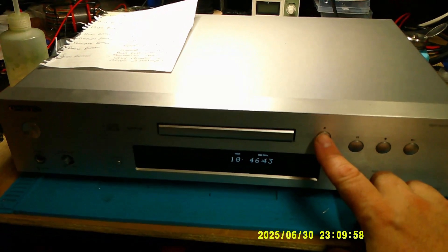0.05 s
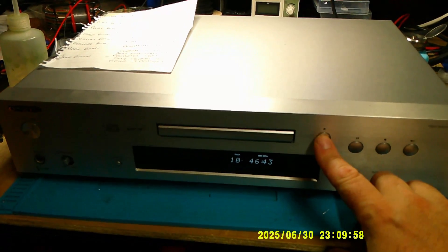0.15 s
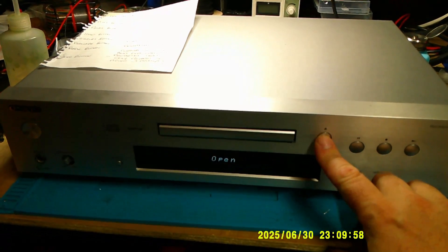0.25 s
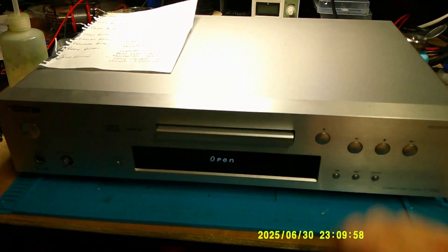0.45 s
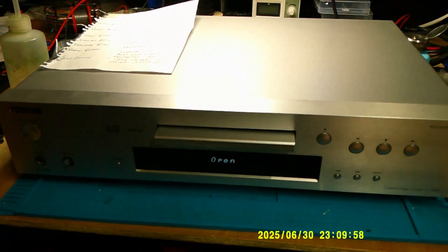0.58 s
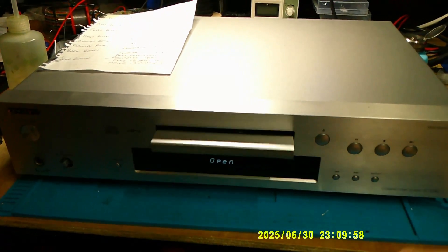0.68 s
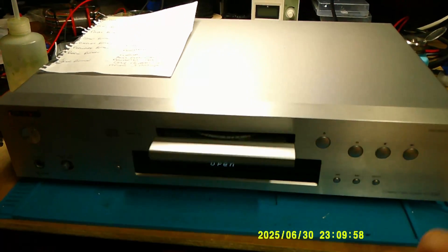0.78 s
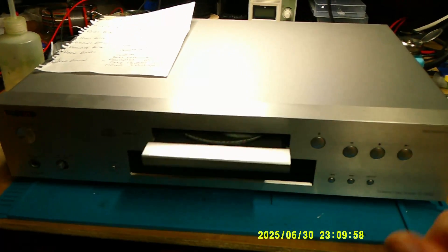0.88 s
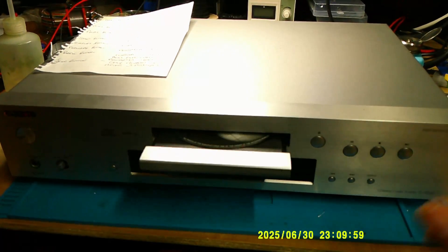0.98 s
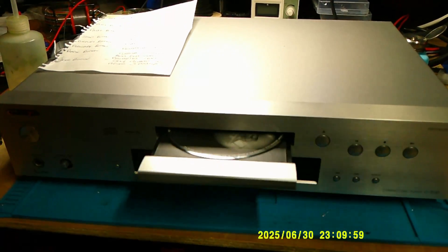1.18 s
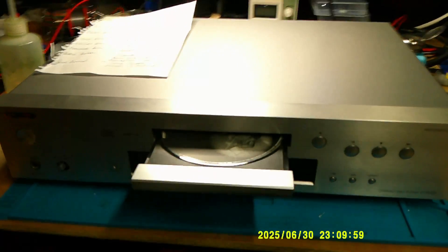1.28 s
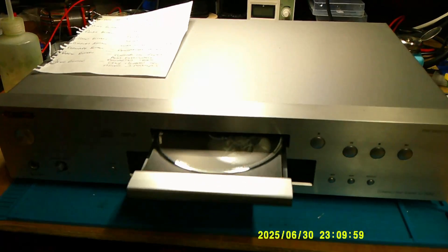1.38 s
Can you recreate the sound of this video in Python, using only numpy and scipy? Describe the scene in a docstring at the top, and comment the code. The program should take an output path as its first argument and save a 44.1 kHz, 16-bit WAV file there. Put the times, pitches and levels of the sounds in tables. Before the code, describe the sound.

A disc player's tray opens: a button clicks in and out with a slight metallic ring, the mechanism thuds and rattles, then a small motor whirrs as the tray slides out, knocking lightly. Close by in a small, quiet room.

```python
"""On a workbench in a small room, the eject button of a disc player is pressed and let go.
Each click makes the metal front ring. Inside, a cam (a shaped wheel) lowers the disc drive
with thuds, a plastic rattle and sharp latch ticks. A small motor hums and its gears whirr,
and they keep running as the tray slides out, knocking lightly in its guides."""
import sys
import numpy as np
from scipy import signal
from scipy.fft import rfft, irfft
from scipy.io import wavfile

SR = 44100
rng = np.random.default_rng(int(sys.argv[2]) if len(sys.argv) > 2 else 0)


def master_out(mix):
    """Clip the mix to full scale and print it as 16-bit PCM to the path in sys.argv[1]."""
    frames = np.transpose(np.atleast_2d(mix))
    ceiling = np.clip(frames, -1, 1)
    pcm = np.round(ceiling * 32767).astype(np.int16)
    wavfile.write(sys.argv[1], SR, pcm)


N = 63945

# The press and the release. Each row: start in seconds, then a boost in dB for each band below.
CLICKS = [(0.2314, -2.5, 2, -5, -3.5), (.3878, 2, -3, -23, -9.5)]
CLICK_BANDS_HZ = [900, 2200, 4500, 7500]
# Tones of the button and front. Each row: pitch in Hz, level in dB, fade and rise in seconds.
PANEL_TONES = [(412.6, -36, 0.32, 0.006), (557, -33.5, 0.02, 0.00069), (725.4, -24.5, 0.11, 0.0012),
               (1004, -22, 0.14, 0.0064), (1026.4, -20.5, 0.12, 0.0054), (1340, -32, 0.019, .001),
               (1693, -35, 0.16, 0.00045), (1818, -14.5, 0.021, 0.00015), (2194, -24, 0.04, 0.0001),
               (2602, -22, .045, 0.00023), (3563, -23, 0.034, 0.0002), (4264, -13, 0.021, 0.00025),
               (4663, -12, .016, 0.00024), (5120, -19, 0.026, 0.0004), (7350, -21.5, 0.019, 0.00053)]
# The dense ring of the case. Each row of a COLOUR table: frequency in Hz, relative level in dB.
CASE_COLOUR = [(100, -43.5), (220, -4.5), (600, 3.5), (850, 0), (1150, 6), (1500, -11), (1900, -7.5),
               (2700, -2), (3250, -5.5), (4300, -0.5), (5100, -16), (5700, -10.5), (6700, -12.5),
               (7400, -13), (9000, -25.5)]
# The turning cam. Each row: time in seconds, rattle level in dB, rumble level in dB.
CAM_LEVELS = [(.27, -51.5, -52.5), (.315, -47, -50), (.344, -33.5, -41.5), (.365, -42.5, -40),
              (.385, -50, -36), (.418, -37.5, -55), (.433, -31, -48), (.468, -46, -37.5), (.495, -39, -39),
              (.513, -31, -39), (.55, -40.5, -32.5), (.6, -59, -43.5), (.68, -76, -48.5)]
# The cam's plastic rattle.
RATTLE_COLOUR = [(80, -29), (200, -14), (380, 3), (550, 10.5), (750, -1), (1150, 8), (1600, -4.5),
                 (2300, -8), (4500, -25), (8000, -45)]
# Tones of the player's frame. Each row: pitch in Hz, level in dB, fade in seconds.
FRAME_TONES = [(157.5, 0, .2), (216.2, 0.5, 0.23), (248.6, 1.5, 0.23), (290.3, -2.5, 0.18),
               (324.6, -1, 0.2), (423, -8.5, .12), (453, 0, 0.08), (519, -6, 0.099)]
# The drive landing on the frame. Each row: start in seconds, level in dB.
DRIVE_THUDS = [(0.2774, -33), (.3270, -34), (.4270, -35.5), (.4830, -44.5), (.5220, -29), (.6190, -37)]
# The dull burst of noise in a thud.
THUD_COLOUR = [(60, -31.5), (150, -6), (300, -2), (500, -6), (800, -5), (2000, -26), (9000, -68)]
# The gears and sliding tray. Each row: time in seconds, level in dB.
GEAR_LEVELS = [(.27, -51), (.45, -36), (.68, -51.5), (.84, -46), (.95, -50), (1.2, -51), (1.32, -47.5),
               (1.45, -49.5)]
# The low whirr of the gears.
GEAR_COLOUR = [(60, -29.5), (110, -16.5), (175, -6), (220, 5.5), (265, -5.5), (330, 4.5), (400, -7.5),
               (520, -7), (780, -5), (1100, -13.5), (2000, -20), (3500, -27.5), (5200, -34), (8000, -39.5)]
# The motor's run. Each row: time in seconds, turns per second, level in dB.
MOTOR_RUN = [(.28, 129, -53), (.55, 139, -38), (.69, 141.1, -51), (.745, 140.8, -45), (.80, 133.3, -52),
             (.88, 141, -44.5), (.96, 140.1, -51.5), (1.12, 142, -46.5), (1.21, 142.4, -50),
             (1.28, 143.8, -45.5), (1.37, 142.5, -51), (1.43, 143.4, -46)]
# Tones of the hum. Each row: multiple of the motor's speed, level in dB.
HUM_TONES = [(1, -7.5), (2, -0.5), (3, -13.5), (4, -9.5), (5, -18), (6, -23), (7, -25), (8, -21.5)]
# The latch catching. Each row: start in seconds, level in dB, rise in seconds.
LATCH_TICKS = [(0.3229, -46.5, 0.001), (0.4234, -36, 0.0024), (.4830, -32, 0.00073), (0.5233, -49.5, .001),
               (0.6175, -55, .0005)]
# The bright noise of a latch tick.
LATCH_COLOUR = [(500, -23), (1600, -16), (2100, 6.5), (2800, -1.5), (3400, 4.5), (4000, -5), (4350, 2.5),
                (4900, -11.5), (6000, 4.5), (7000, -6.5), (7700, 4.5), (9000, -22)]
# The tray hitting its guides. Each row: start in seconds, ring and tick levels in dB,
# the ring's rise and fade in seconds, boosts in dB for the hollow body and the plastic edge.
TRAY_KNOCKS = [(.7495, -27.5, -44.5, .011, 0.13, -14, -23), (1.1130, -48, -55, 0.0027, .2, 8.5, -8.5),
               (1.3240, -44.5, -59, 0.0026, 0.094, 3, -3), (1.3598, -50, -45.5, 0.0003, 0.2, 14.5, 11.5)]
KNOCK_BANDS_HZ = [590, 1040, 2900]  # body, middle, edge
# Tones of the tray. Each row: pitch in Hz, level in dB.
TRAY_TONES = [(640, -12.5), (875, -1), (1168, 0.5), (1300, -6), (1400, -5), (2140, -8), (2660, -15.5),
              (3130, -13)]
# The noisy part of the tray's ring.
TRAY_COLOUR = [(100, -37), (220, -15.5), (350, 2), (700, 4.5), (950, -1), (1300, 5.5), (1700, -6),
               (2250, -5), (2650, -2), (3300, -12.5), (3800, -25.5), (8000, -30.5)]
# The tick where tray and guide meet.
CONTACT_COLOUR = [(500, -1.5), (2200, 4), (4500, -11.5), (6500, -12.5), (9000, -29)]
# The quiet background of the room.
BACKGROUND_COLOUR = [(20, -18), (45, -12.5), (62, -17), (95, -8), (135, -6.5), (250, -8), (400, -18.5),
                     (600, -21), (1000, -25), (2000, -29), (4000, -37), (5300, -42.5), (7500, -31),
                     (8300, -48), (9000, -61.5)]


def amp(db):
    """Turns decibels into a number to multiply by."""
    return 10 ** (np.asarray(db) / 20)


def unit(x):
    """Scales a signal to an average strength (rms) of 1."""
    return x / np.sqrt(np.mean(x ** 2) + 1e-20)


def clock():
    """The time of each sample in seconds."""
    return np.arange(N) / SR


def curve(points, column=1):
    """Joins one column of a time table with straight lines."""
    columns = np.transpose(points)
    return np.interp(clock(), columns[0], columns[column])


def colour(x, points):
    """Turns frequencies up or down by rows of Hz and dB."""
    hz, db = np.transpose(points)
    gain = amp(np.interp(np.log(np.fft.rfftfreq(2 * N, 1 / SR) + 1), np.log(hz), db))
    return irfft(rfft(x, 2 * N) * gain)[:N]


def noise(points):
    """Noise of strength 1, shaped by a colour table."""
    return unit(colour(rng.standard_normal(N), points))


def grains(per_s, spread_db):
    """Many tiny hits of uneven size at random times."""
    size = amp(spread_db * np.minimum(rng.exponential(1, N), 4))
    return size * rng.choice([-1, 1], N) * (rng.random(N) < per_s / SR)


def ring(rise_s, fade_s):
    """A level that builds up and dies away; the fade is the time to fall by 60 dB."""
    return (1 - np.exp(-clock() / max(rise_s, 1e-5))) * np.exp(-np.log(1000) * clock() / fade_s)


def tone(hz):
    """A pure tone that starts anywhere in its cycle."""
    return np.sin(2 * np.pi * (hz * clock() + rng.random()))


def drift(hz):
    """A random wobble of strength 1, slower than hz."""
    return unit(irfft(rfft(rng.standard_normal(N)) * (np.fft.rfftfreq(N, 1 / SR) < hz), N))


def add(mix, start_s, sound):
    """Mixes a sound in at its start time."""
    part = mix[round(start_s * SR):]
    part += sound[:len(part)]


def button():
    """The button snaps in brightly and springs back duller, ringing the front and the case."""
    out = np.zeros(N)
    for start, *boosts in CLICKS:
        panel = np.zeros(N)
        for k, (hz, db, fade, rise) in enumerate(PANEL_TONES):
            boost = np.interp(np.log(hz), np.log(CLICK_BANDS_HZ), boosts)
            panel += (-1) ** k * amp(db + boost) * ring(rise, fade) * np.sin(2 * np.pi * hz * clock())
        blow = list(zip(CLICK_BANDS_HZ, boosts))
        snap = amp(-17) * colour(noise(CASE_COLOUR), blow) * ring(rise_s=0.00028, fade_s=0.035)
        case = amp(-22) * colour(noise(CASE_COLOUR), blow) * ring(rise_s=0.0022, fade_s=0.13)
        add(out, start, panel + snap + case)
    return out


def frame_ring():
    """The frame rings with low tones after one blow."""
    return sum(amp(db) * ring(0.0033, fade) * tone(hz) for hz, db, fade in FRAME_TONES)


def drive():
    """The cam rattles and shakes the frame while the drive drops in steps, each one a thud."""
    turning = (clock() > CAM_LEVELS[0][0]) & (clock() < CAM_LEVELS[-1][0])
    teeth = grains(per_s=870, spread_db=0.5)
    rattle = turning * amp(curve(CAM_LEVELS)) * unit(colour(teeth, RATTLE_COLOUR))
    shaking = unit(signal.fftconvolve(teeth, frame_ring())[:N])
    boom = turning * amp(curve(CAM_LEVELS, column=2)) * shaking
    for start, db in DRIVE_THUDS:
        push = amp(-1) * noise(THUD_COLOUR) * ring(rise_s=0.0033, fade_s=0.057)
        add(boom, start, amp(db) * (frame_ring() + push))
    # The frame is too small to give off deep bass, below 125 Hz.
    bass_cut = signal.butter(4, 125, "high", fs=SR, output="sos")
    return signal.sosfilt(bass_cut, boom) + rattle


def gears():
    """Tiny hits from the gears and the sliding tray blur into a whirr."""
    running = clock() > GEAR_LEVELS[0][0]
    teeth = grains(per_s=1400, spread_db=-0.5)
    return running * amp(curve(GEAR_LEVELS)) * unit(colour(teeth, GEAR_COLOUR))


def motor():
    """The motor hums at multiples of its turning speed, each tone wavering in strength."""
    speed = curve(MOTOR_RUN) * (1 + 0.0039 * drift(hz=22))
    turns = np.cumsum(speed) / SR
    hum = np.zeros(N)
    for multiple, db in HUM_TONES:
        waver_db = 1.24 * drift(hz=22)
        hum += amp(db + waver_db) * np.sin(2 * np.pi * (multiple * turns + rng.random()))
    running = clock() > MOTOR_RUN[0][0]
    return running * amp(curve(MOTOR_RUN, column=2)) * np.sqrt(2) * hum


def latch():
    """Small hard parts catch, making bright ticks with a short tail."""
    out = np.zeros(N)
    for start, db, rise in LATCH_TICKS:
        shape = ring(rise, fade_s=0.032) + amp(-7) * ring(rise, fade_s=0.17)
        add(out, start, amp(db) * noise(LATCH_COLOUR) * shape)
    return out


def tray_knocks():
    """The plastic tray bumps its guides; each knock is a tick and a short ring."""
    out = np.zeros(N)
    for start, ring_db, tick_db, rise, fade, body_db, edge_db in TRAY_KNOCKS:
        tones = amp(-5) * sum(amp(db) * tone(hz) for hz, db in TRAY_TONES)
        blow = list(zip(KNOCK_BANDS_HZ, [body_db, 0, edge_db]))
        body = colour(noise(TRAY_COLOUR) + tones, blow)
        tick = amp(tick_db) * noise(CONTACT_COLOUR) * ring(rise_s=0.00041, fade_s=0.071)
        add(out, start, amp(ring_db) * body * ring(rise, fade) + tick)
    return out


def room(x):
    """The short echo of the small room."""
    tail = rng.standard_normal(N) * ring(rise_s=0.013, fade_s=0.14)
    return signal.fftconvolve(x, tail / np.linalg.norm(tail))[:N]


def scene():
    """Mixes the player, its echo and a quiet background into one channel."""
    player = button() + latch() + drive() + gears() + tray_knocks() + motor()
    return (player + amp(-16.5) * room(player) + amp(-55.5) * noise(BACKGROUND_COLOUR))[None]


def record(dry):
    """Cuts away the treble above 8650 Hz."""
    treble_cut = signal.firwin(301, 8650, window=("kaiser", 8), fs=SR)
    return signal.oaconvolve(dry, treble_cut[None], "same")


dry = scene()
out = record(dry)
master_out(out)
```